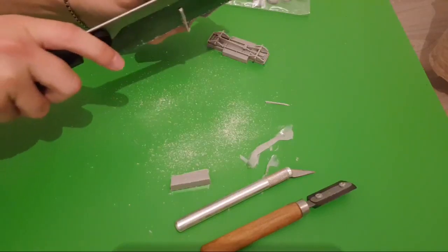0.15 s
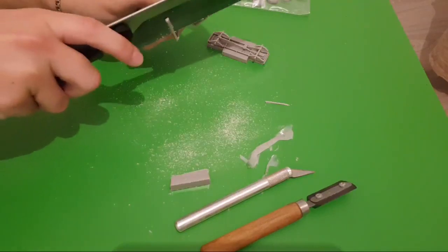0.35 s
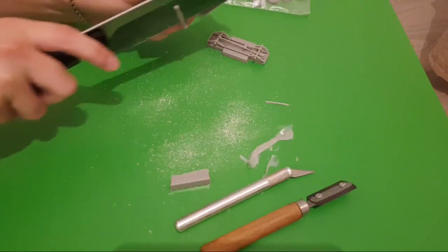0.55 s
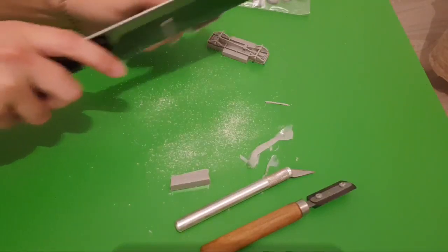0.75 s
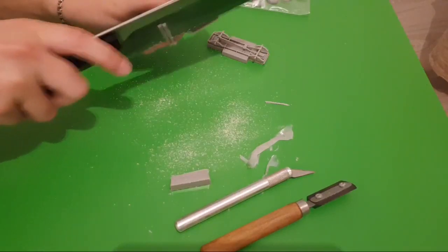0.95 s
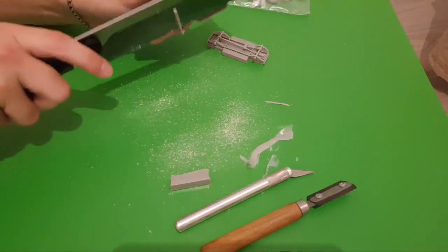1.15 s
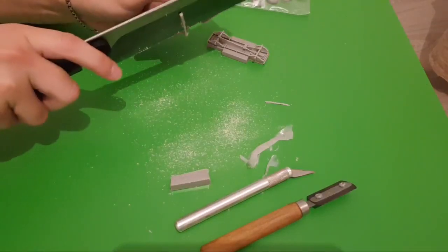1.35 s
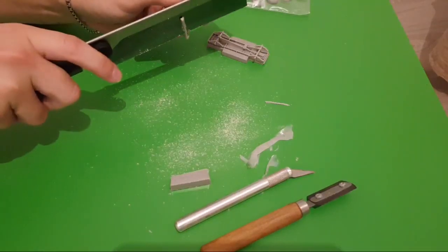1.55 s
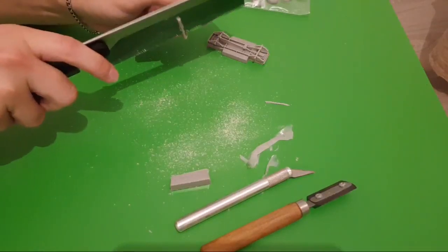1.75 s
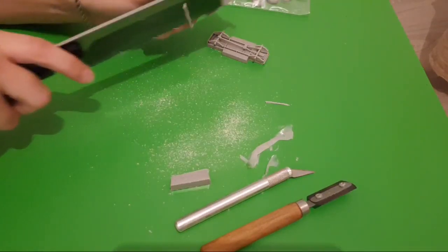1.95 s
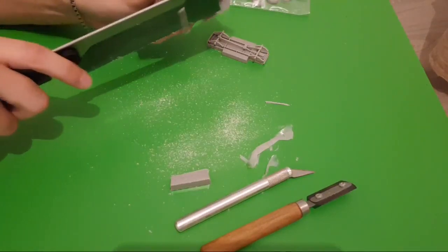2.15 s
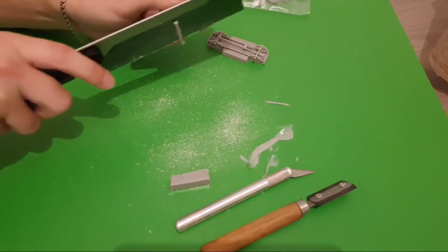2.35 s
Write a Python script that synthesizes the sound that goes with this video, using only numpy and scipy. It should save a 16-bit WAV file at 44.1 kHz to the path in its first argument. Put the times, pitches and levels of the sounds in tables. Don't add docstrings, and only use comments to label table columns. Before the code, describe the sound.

A fine razor saw cuts a small resin piece in short, bright, gritty strokes, pauses, then resumes more softly; close microphone in a live, hard-walled room with faint low desk thumps.

```python
import sys
import numpy as np
from scipy import signal
from scipy.fft import rfft, irfft
from scipy.io import wavfile

SR = 44100
rng = np.random.default_rng(int(sys.argv[2]) if len(sys.argv) > 2 else 0)


def decibels_to_gain(level_db):
    exponent = np.asarray(level_db, float) / 20
    return 10 ** exponent


def materialize(psi):
    bounded = np.clip(np.atleast_2d(psi).T, -1, 1)
    quanta = np.round(bounded * 32767).astype(np.int16)
    wavfile.write(sys.argv[1], SR, quanta)


N = 110250
LEAD = SR // 5
TOTAL = N + LEAD
TIME = (np.arange(TOTAL) - LEAD) / SR


def rms_one(x):
    return x / np.sqrt(np.mean(x ** 2) + 1e-20)


def at_hz(points, hz):
    table_hz, values = np.transpose(points)
    return np.interp(np.log(hz), np.log(table_hz), values)


def ring(clicks, hz, t60):
    r = decibels_to_gain(-60 / (t60 * SR))
    w = 2 * np.pi * hz / SR
    return signal.lfilter([0, np.sin(w)], [1, -2 * r * np.cos(w), r * r], clicks + 1e-18)


def butter(x, hz, kind, order):
    return signal.sosfilt(signal.butter(order, hz, kind, fs=SR, output="sos"), x)


# frequency in Hz, density in dB per Hz.
HISS_SPECTRUM = [(18, -39.5), (30, -19.5), (134, -11), (303, -24), (449, -22), (569, -35), (721, -30),
                 (7670, -39), (16000, -24)]


def hiss():
    hz = np.maximum(np.fft.rfftfreq(TOTAL, 1 / SR), 1)
    spectrum = rfft(rng.standard_normal(TOTAL)) * decibels_to_gain(at_hz(HISS_SPECTRUM, hz))
    return decibels_to_gain(-72) * rms_one(irfft(spectrum, TOTAL))


# frequency in Hz, level in dB, decay time T60 in seconds.
DESK_MODES = [(65, -55.5, 0.33), (102, -44.5, 0.15), (128, -39, 0.27), (171, -45.5, 0.3), (194, -55.5, 1)]
# start in seconds, frequency in Hz, level in dB, rise in seconds, T60 in seconds.
DESK_NUDGES = [(-.03, 194, -43.5, 0.0076, 0.73), (0.221, 175, -43.5, 0.013, 0.2),
               (.53, 140, -62, 0.028, 0.35), (0.602, 65, -59, 0.053, 0.4), (.78, 152.5, -40.5, 0.019, 0.13),
               (0.821, 125, -57.5, 0.05, 0.3), (1.082, 65, -54.5, 0.046, 0.8),
               (1.25, 131, -62, 0.031, 0.37), (1.92, 60.5, -52, 0.02, 0.46), (2.051, 101, -68, 0.059, .4),
               (2.219, 128, -55, 0.027, 0.63), (2.241, 188.4, -59.5, 0.032, 0.62)]


def rumble(force):
    shake_release_s, idle_shake = 0.033, 0.0071
    opening_db, opening_t60_s = -57, .55
    r = np.exp(-1 / (shake_release_s * SR))
    strength = signal.lfilter([1 - r], [1, -r], idle_shake + np.sqrt(force[0]))
    out = np.zeros(TOTAL)
    for hz, level_db, t60 in DESK_MODES:
        shake = strength * rng.standard_normal(TOTAL)
        out += decibels_to_gain(level_db - 35) * ring(shake, hz, t60)
    boom = rms_one(butter(rng.standard_normal(TOTAL), [230, 650], "band", order=2))
    out += decibels_to_gain(opening_db - 60 * TIME / opening_t60_s) * boom
    for start, hz, level_db, rise, t60 in DESK_NUDGES:
        t = np.clip(TIME - start, 0, None)
        swell = np.minimum(t / rise, 1)
        decay = decibels_to_gain(level_db - 60 * np.maximum(t - rise, 0) / t60)
        out += decay * swell * np.sin(2 * np.pi * hz * t)
    return out


# frequency in Hz, T60 in seconds.
REVERB_T60 = [(300, 0.47), (800, 0.64), (2300, 0.68), (3500, 0.65), (10000, 0.56)]
# frequency in Hz, level in dB.
REVERB_DB = [(300, -12.5), (800, -3.5), (2300, -15), (5000, -8.5), (12000, -15)]
HAND_SHIFTS = [
    .15,
    .43,
    .72,
    .91,
    1.6,
    2.13,
]


def echoes():
    early_db, early_t60_s, first_echo_s = 1, 0.34, 0.0055
    t = np.arange(SR) / SR
    edges = 150 * 2 ** np.arange(0, 7.1, .5)
    white = rng.standard_normal((2, len(HAND_SHIFTS) + 1, SR))
    tail = 0
    for k, (low, high) in enumerate(zip(edges, edges[1:])):
        hz = np.sqrt(low * high)
        late = decibels_to_gain(-60 * t / at_hz(REVERB_T60, hz))
        early = decibels_to_gain(early_db - 60 * t / early_t60_s)
        band = butter(white[k % 2], [low, high], "band", order=2)
        tail = tail + decibels_to_gain(at_hz(REVERB_DB, hz) - 30) * (late + early) * band
    return tail * np.clip(t / first_echo_s - 1, 0, 1)


def room(x):
    place = np.searchsorted(HAND_SHIFTS, TIME)
    out = np.zeros(TOTAL)
    for k, response in enumerate(echoes()):
        out += signal.fftconvolve(x * (place == k), response)[:TOTAL]
    return out


# start in seconds, length in seconds.
CUT_SPANS = [(-.09, .07), (.210, .047), (.263, .02), (.302, .008), (.4605, .010), (.4815, .012),
             (.5005, .0545), (.568, .034), (.756, .010), (.768, .016), (.786, .025), (.815, .027),
             (.938, .015), (.983, .014), (1.046, .053), (1.102, .033), (1.196, .021), (1.5, .06),
             (1.846, .011), (1.894, .028), (1.928, .06), (2.175, .03), (2.205, .06), (2.265, .045),
             (1.026, .004), (1.035, .004), (1.831, .013), (2.167, .008), (.477, .005)]
# level in dB, upper body in dB, blade in dB.
CUT_FORCES = [(-25, -0.5, 1), (-18, 1.5, 5.5), (-22, -8, 1.5), (-24.5, -12.5, 1.5), (-25.5, 3, 2),
              (-18.5, 5.5, 9), (-19.5, 7, 10), (-32.5, 7.5, 5.5), (-23.5, 2.5, 7), (-21, -1, 2),
              (-23.5, -2, 5), (-20, -3, -1.5), (-22, -2, 3.5), (-19.5, 1, 8.5), (-21.5, 3.5, 9),
              (-35, -2, -3), (-32, -8, 3), (-68, -14, -9), (-25.5, 1.5, 6), (-28, 12.5, 12), (-27, 3, 6.5),
              (-33.5, 3.5, 4), (-28.5, -5.5, 2.5), (-31.5, -14, -12), (-22, -1.5, 4.5), (-20, -2, 12),
              (-43.5, -1.5, -1), (-40, -5, 1), (-32, 0, 3)]


def pressure():
    attack_s, release_s, blade_lag_s = .0012, .003, 0.0026
    force = np.zeros((3, TOTAL))
    for (start, length), (level_db, upper_db, blade_db) in zip(CUT_SPANS, CUT_FORCES):
        rise = np.clip((TIME - start) / attack_s, 0, 1)
        fall = np.exp(-np.clip(TIME - start - length, 0, 1) / release_s)
        force += rise * fall * decibels_to_gain(level_db + np.array([[0], [upper_db], [blade_db]]))
    lag = np.exp(-1 / (blade_lag_s * SR))
    force[2] = signal.lfilter([1 - lag], [1, -lag], force[2])
    return force


def teeth():
    teeth_per_s, spacing_jitter = 450, .45
    tooth_spread_db, small_teeth_db = 2.5, -5
    shudder_db, shudder_hz = 0, 87.7
    draw = rng.standard_normal((2000, 2))
    at = (np.cumsum(np.exp(spacing_jitter * draw[:, 0])) * SR / teeth_per_s).astype(int)
    inside = at < TOTAL
    catches = np.zeros(TOTAL)
    catches[at[inside]] = decibels_to_gain(tooth_spread_db * draw[inside, 1])
    sway = rms_one(butter(rng.standard_normal((3, TOTAL)), shudder_hz, "low", order=2))
    rasp = rms_one(decibels_to_gain(shudder_db * sway) * rng.standard_normal((3, TOTAL)))
    return decibels_to_gain(small_teeth_db) * rms_one(catches), rasp


def scrape(clicks, length_s):
    r = np.exp(-1 / (length_s * SR))
    size = signal.lfilter([np.sqrt(1 - r * r)], [1, -r], np.abs(clicks) + 1e-18)
    return size * rng.standard_normal(TOTAL)


# time in seconds, peak in dB.
SNAGS = [(.2050, -16), (.2103, -9), (.5076, -7), (.5231, -5), (.5638, -9), (.7603, -15), (.7856, -9),
         (.8066, -9), (.8481, -19), (.9850, -13), (1.0262, -14), (1.0352, -12), (1.0458, -12),
         (1.1166, -19), (1.2055, -24), (1.2143, -28), (1.505, -58), (1.8364, -40), (1.8907, -19),
         (1.9029, -8), (1.9153, -11), (1.9628, -15), (1.9839, -14), (2.1762, -22), (2.19, -26),
         (2.2007, -22), (2.239, -22), (2.2824, -22), (2.2913, -24)]
# upper body in dB, blade in dB.
SNAG_TINTS = [(5.5, 5), (-2, 4), (-4, 7.5), (-3, 5.5), (-5, -7.5), (4, 4.5), (-6, -8), (-17.5, -8.5),
              (-4.5, 2), (-1, 3), (9.5, 8), (0, 5.5), (0, 2), (-4, 14.5), (5, 13), (4, 4), (-9, 1), (1, 21),
              (9.5, 28), (-10, -6), (-1.5, 18.5), (5, 12), (9, 7), (7, 9), (2, 20.5), (7, 16), (7, 25),
              (11, -5), (3, 4)]
# time in seconds, peak in dB, upper body in dB.
CLEAR_BITES = [(.2187, -12, 0), (.2220, -12, 0), (.2274, -12, 0), (.2310, -14, 0), (.2369, -13, 0),
               (.2476, -15, 0), (.2538, -11, -6), (.2648, -16, 0), (.2680, -16, 0), (.2738, -19, 0),
               (.4615, -21, 3), (.4837, -13, 0), (.4935, -15, 0), (.5019, -10, -2), (.5120, -8, 0),
               (.5173, -11, 2), (.5269, -6, -2), (.5305, -8, 0), (.5358, -8, 0), (.5422, -10, 0),
               (.5526, -9, 0), (.5571, -15, 0), (.5813, -18, 0), (.7769, -19, 0), (.7890, -15, 0),
               (.7935, -14, -4), (.7972, -14, -2), (.8030, -15, 0), (.8183, -17, 0), (.9439, -18, 2),
               (.9494, -17, 2), (.9895, -17, 0), (.9928, -16, 2), (1.0375, -14, 0), (1.0518, -9, 0),
               (1.0575, -11, -4), (1.0667, -11, 0), (1.0753, -13, 2), (1.0825, -16, 0), (1.0952, -16, 0),
               (1.1305, -23, 0), (1.85, -22, 0), (1.8991, -16, 3), (1.9114, -20, 3), (1.9284, -21, 4),
               (1.9373, -21, 4), (1.9489, -18, 4), (1.9745, -18, 4), (2.2088, -25, 3), (2.2165, -22, 3),
               (2.2194, -22, 3), (2.2267, -23, 0), (2.2317, -21, 0), (2.2435, -23, -3), (2.2531, -24, 0),
               (2.2584, -23, -3), (2.2713, -24, -3), (.5095, -10, -3), (1.0555, -13, -3), (1.965, -17, 5)]
# frequency in Hz, level in dB, T60 in seconds.
PART_LOW_MODES = [(564, -43, 0.011), (1147, -23.5, 0.0084), (1733, -11.5, 0.0061), (2085, -2.5, 0.01),
                  (2232, -4.5, 0.025), (2360, 1, 0.015), (2520, -2.5, 0.017)]
# frequency in Hz, level in dB, T60 in seconds.
PART_UPPER_MODES = [(2636, -12.5, 0.028), (2815, -2, 0.0079), (2960, -14, 0.0064), (3555, -8, 0.011),
                    (3977, -7, 0.0061), (4830, -13.5, .004)]
# frequency in Hz, level in dB, T60 in seconds.
BLADE_MODES = [(5460, -15, 0.0017), (7000, -18.5, 0.0045), (8100, -21.5, 0.0046), (9594, -18, 0.0039),
               (10960, -19, 0.0027), (12800, -17.5, 0.0016), (15100, -18.5, 0.0017)]
CONTACT_S = [.0003, 0.00031, 0.0018]
RASP_LEVELS = [-2, -3, 2.5]
# time in seconds, centre frequency in Hz.
GRIP_CENTRE = [(0.0, 2060), (0.07, 2240), (0.17, 2380), (0.31, 1920), (0.6, 2530), (0.79, 2250),
               (0.88, 2150), (0.93, 2530), (1.29, 2240), (1.41, 2405), (1.49, 2240), (1.86, 2380),
               (1.88, 2570), (2.12, 2230), (2.16, 2880), (2.23, 2150), (2.5, 2140)]
# time in seconds, centre frequency in Hz.
FLEX_CENTRE = [(0, 9600), (0.349, 9600), (.5, 10560), (.85, 9970), (1.05, 7410), (1.9, 7000), (2.5, 7200)]
# frequency in Hz, level in dB.
DEEP_CUT = [(2500, -0.5), (3000, 5), (3600, 0), (4200, -8.5), (5500, -0.5), (6900, 5.5), (8200, 1.5)]


def saw(force):
    mode_scatter_db, soft_low_db = 4, -3
    rebound_s, rebound_share = .00044, .7
    snag_blade_db, bite_blade_db = -1.5, 3
    grip_db_per_percent, grip_limit_db = 0.06, 7
    flex_db, flex_width = 3.5, 0.11
    pause_s = 1.7
    body_low_hz, body_high_hz = 1890, 5020
    thud_db, crack_db = -30, -17

    catches, rasp = teeth()
    hard = np.hstack([SNAGS, SNAG_TINTS])
    bites = [(*row, bite_blade_db) for row in CLEAR_BITES]
    snags = np.vstack([hard, bites])
    at = (snags[:, 0] * SR).astype(int) + LEAD
    scatter = rng.standard_normal((len(snags), 24))
    scatter[:, 3:7] -= scatter[:, 3:7].mean(axis=1, keepdims=True)
    grip = np.interp(TIME, *np.transpose(GRIP_CENTRE))
    flex = np.interp(TIME, *np.transpose(FLEX_CENTRE))
    out, body, mode = np.zeros(TOTAL), np.zeros(TOTAL), 0

    for group, modes in enumerate([PART_LOW_MODES, PART_UPPER_MODES, BLADE_MODES]):
        contacts = scrape(catches, CONTACT_S[group]) if group else catches
        drive = decibels_to_gain(-19) * force[group] * (contacts + decibels_to_gain(RASP_LEVELS[group]) * rasp[group])
        peak_db = snags[:, 1] - 11 + (snags[:, group + 1] if group else 0)
        for hz, level_db, t60 in modes:
            in_body = 1900 < hz < 5000
            hits = np.zeros(TOTAL)
            soft_db = soft_low_db * (hz < body_low_hz)
            hits[at] = decibels_to_gain(peak_db + mode_scatter_db * scatter[:, mode] + soft_db)
            if group == 0:
                hits = rebound_share * (hits + np.roll(hits, int(rebound_s * SR)))
            if group == 2:
                hits = decibels_to_gain(snag_blade_db) * scrape(hits, CONTACT_S[group])
            sign = (-1) ** (mode // 2 if in_body else mode)
            clicks = sign * drive + hits
            if 1900 < hz < 3000:
                percent = 100 * np.abs(np.log(hz / grip))
                clicks = clicks * decibels_to_gain(-np.minimum(grip_db_per_percent * percent, grip_limit_db))
            if group == 2:
                clicks = clicks * decibels_to_gain(flex_db * np.exp(-(np.log(hz / flex) / flex_width) ** 2))
            deep_db = at_hz(DEEP_CUT, hz) * (TIME > pause_s)
            rung = decibels_to_gain(level_db + deep_db) * ring(clicks, hz, t60)
            if in_body:
                body += rung
            else:
                out += rung
            mode += 1
        if group == 0:
            push = drive * force[0] / (force[1] + 1e-12)
            out += decibels_to_gain(thud_db) * 10 * butter(push, [330, 2100], "band", order=1)

    crack = decibels_to_gain(crack_db) * butter(clicks, 16000, "high", order=2)
    return out + butter(body, [body_low_hz, body_high_hz], "band", order=3) + crack


def scene():
    force = pressure()
    cut = saw(force)
    mix = cut + room(cut) + rumble(force) + hiss()
    return mix[None, LEAD:]


def roll_off(x):
    return signal.sosfilt(signal.butter(12, 16520, fs=SR, output="sos"), x)


def record(dry):
    bass_cut = butter(dry, 58, "high", order=4)
    treble_cut = signal.cheby2(14, 45, 16050, fs=SR, output="sos")
    mix = signal.sosfilt(treble_cut, bass_cut)
    return roll_off(mix)


dry = scene()
out = record(dry)
materialize(out)
```